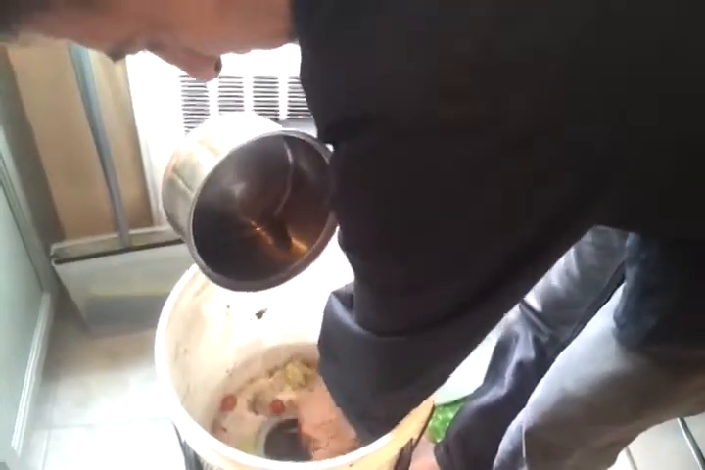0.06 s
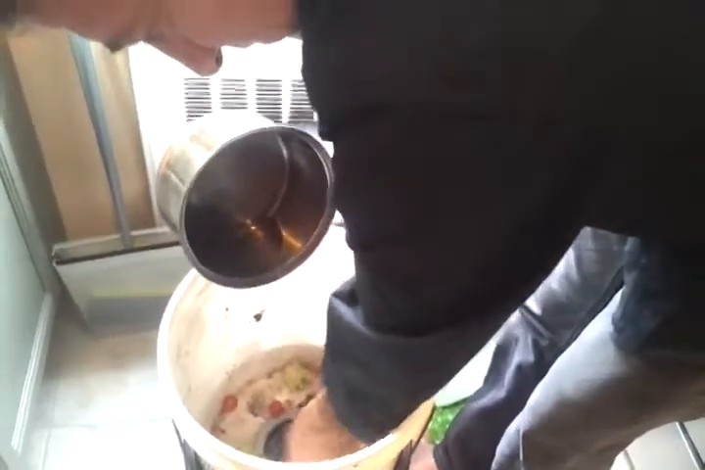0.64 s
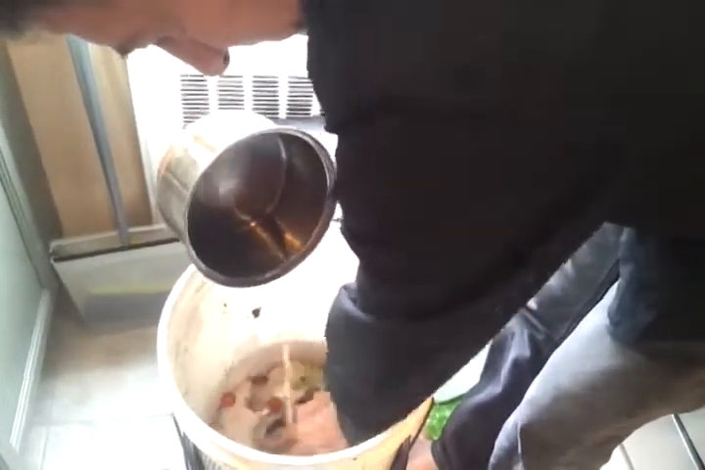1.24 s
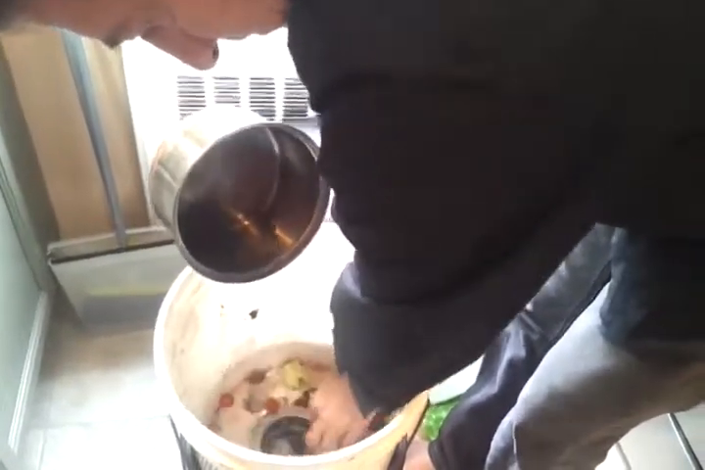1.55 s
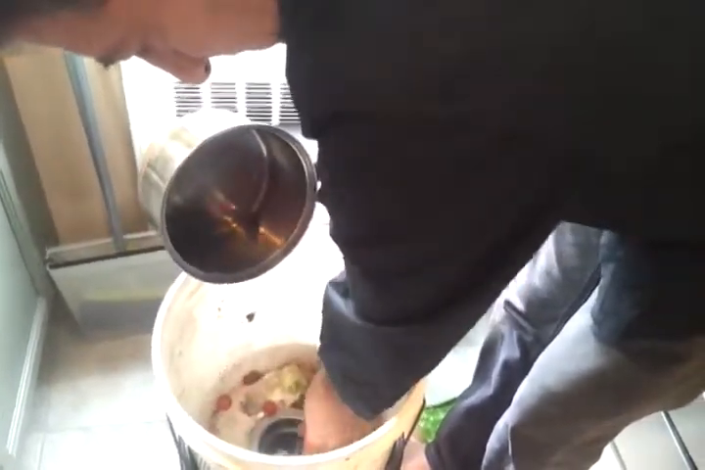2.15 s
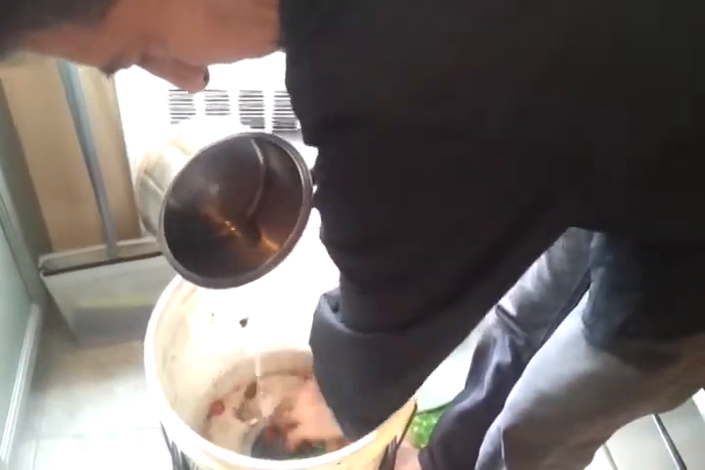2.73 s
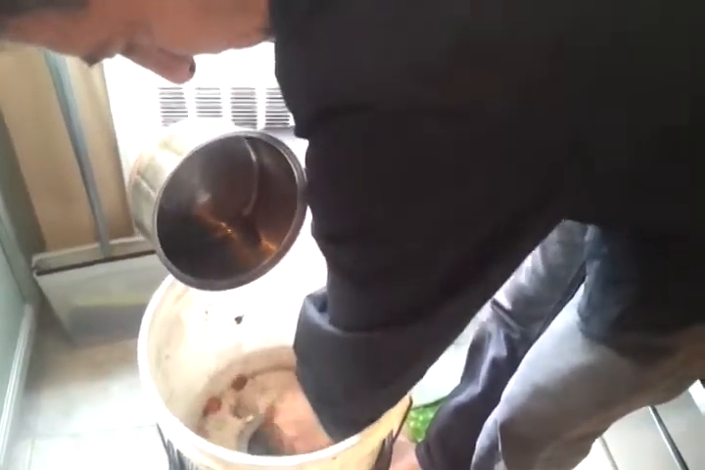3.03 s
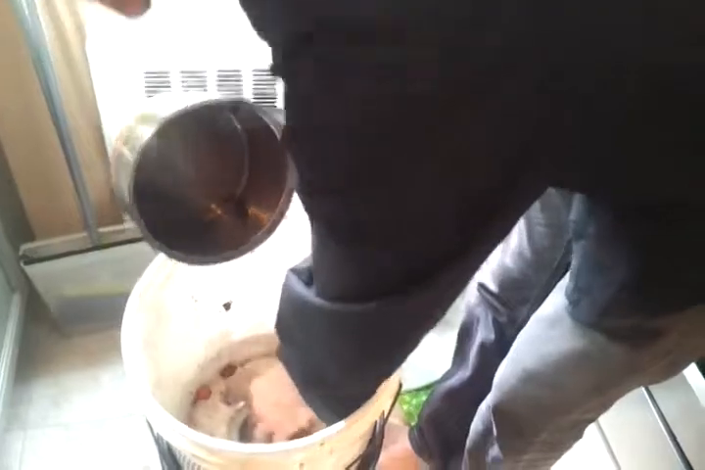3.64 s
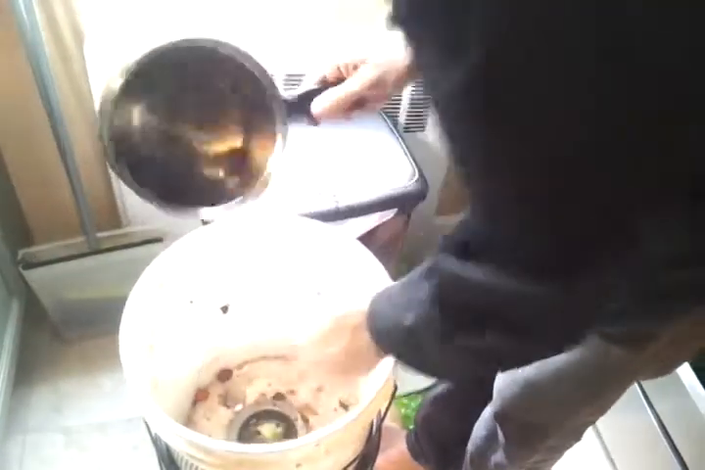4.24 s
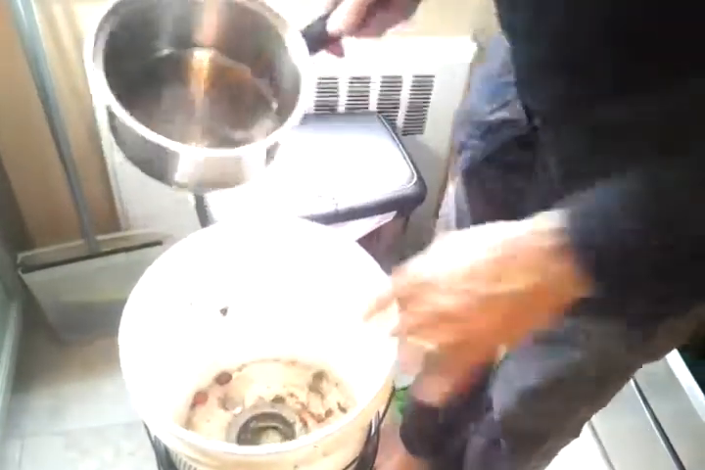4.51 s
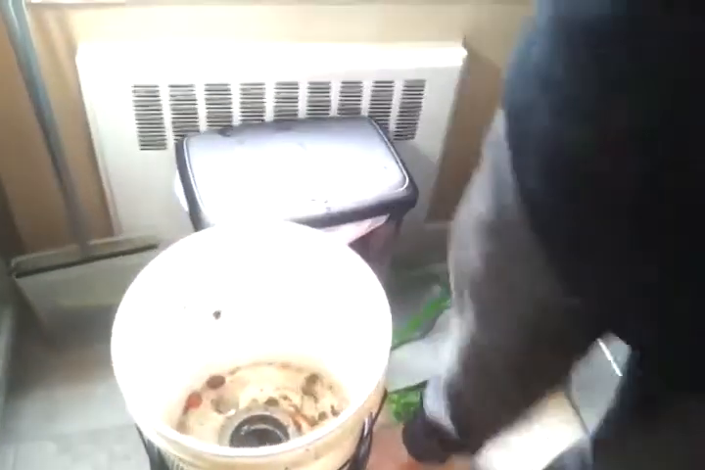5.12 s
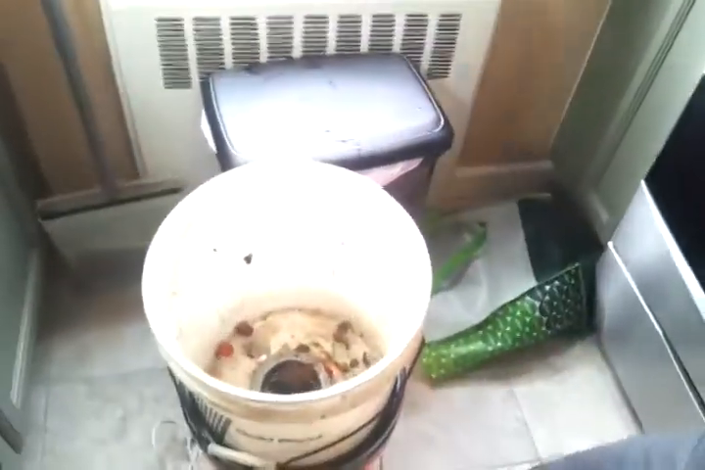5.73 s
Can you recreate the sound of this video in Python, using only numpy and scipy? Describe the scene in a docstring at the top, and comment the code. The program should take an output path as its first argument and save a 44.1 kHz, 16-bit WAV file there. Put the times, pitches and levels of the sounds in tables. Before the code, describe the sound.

Heavy, uneven thumps and rattles sound over the low hum of a grinder motor as food scraps churn beneath a plastic bucket. Hard bits clack on steel, the opening rings with a hollow howl and wet pulp squelches. In the second half the crunching turns brighter, with short gushes and spitting drops. The grinding runs throughout, heard close up in a small room.

```python
"""A heavy lump thumps and tumbles over a motor's hum: a food waste grinder under a plastic bucket,
close to one microphone in a small room. Scraps pushed in by hand rattle round the grinding chamber,
crack on its steel, ring the air in its throat and shake the bucket; wet pulp hisses and spits.
From about 3.5 s the arm is drawn out of the bucket: the air resonances rise, and a brighter crunch
and fine spray come through the opening."""
import sys
import numpy as np
from scipy import signal
from scipy.fft import rfft, irfft
from scipy.io import wavfile
from scipy.ndimage import uniform_filter1d, minimum_filter1d

SR = 44100
rng = np.random.default_rng(int(sys.argv[2]) if len(sys.argv) > 2 else 0)


def put_to_file(sound):
    """Save the sound as 16-bit audio at rate SR, in the file named by the first command-line argument."""
    columns = np.atleast_2d(sound).T  # one column per channel
    safe = np.clip(columns, -1, 1)
    whole_steps = np.round(safe * 32767)
    wavfile.write(sys.argv[1], SR, whole_steps.astype(np.int16))


N = 258867
T = np.arange(N) / SR


def amp(db):
    """Decibels to gain."""
    return 10 ** (np.asarray(db) / 20)


def unit(x):
    """Scale to rms 1."""
    return x / np.sqrt(np.mean(x ** 2) + 1e-20)


def curve(rows):
    """A table of times and values as a curve over the scene."""
    return np.interp(T, *np.transpose(rows))


def drift(rate_hz):
    """Slow random wander of rms 1."""
    f = np.fft.rfftfreq(N, 1 / SR)
    return unit(irfft(rfft(rng.standard_normal(N)) / (1 + (f / rate_hz) ** 4), N))


def colour(x, points, size=2048):
    """Causal filter with the given spectrum."""
    hz, db = np.transpose(points)
    f = abs(np.fft.fftfreq(size, 1 / SR))
    log_gain = np.log(amp(np.interp(np.log(f + 1), np.log(hz), db)))
    taps = np.fft.ifft(np.exp(np.conj(signal.hilbert(log_gain)))).real  # minimum phase
    return signal.oaconvolve(x, taps)[:N]


def resonate(x, hz, width_hz):
    """A fixed or moving resonance of gain 1."""
    turn = np.exp(2j * np.pi * np.cumsum(hz * np.ones(N)) / SR)
    pole = np.exp(-np.pi * width_hz / SR)
    return 2 * (turn * signal.lfilter([1 - pole], [1, -pole], x / turn + 1e-18)).real


def modes(x, rows):
    """A bank of fixed resonances."""
    return sum(amp(db) * signal.lfilter(*signal.iirpeak(hz, hz / width, SR), x)
               for hz, width, db in rows)


def band(x, lo_hz, hi_hz, order=2):
    """Band-pass."""
    return signal.sosfilt(signal.butter(order, [lo_hz, hi_hz], "band", fs=SR, output="sos"), x)


def rattle(per_s, spread_db, scraping, clump_db, clump_hz):
    """Force of many small impacts of uneven size over steady scraping, coming in clumps."""
    sizes = amp(spread_db * np.minimum(rng.exponential(1, N), 3)) * rng.choice([-1, 1], N)
    impacts = unit(sizes * (rng.random(N) < per_s / SR))
    return (impacts + scraping * rng.standard_normal(N)) * amp(clump_db * drift(clump_hz))


def bursts(per_s, spread_db, rise_s, decay_s, size=4096):
    """Envelope of separate bursts at random moments, rms 1; their rate may be a curve."""
    t = np.arange(size) / SR
    sizes = amp(spread_db * np.minimum(rng.exponential(1, N), 2.5))
    starts = sizes * (rng.random(N) < per_s / SR)
    shape = (1 - np.exp(-t / rise_s)) * np.exp(-t / decay_s)
    return unit(np.sqrt(abs(signal.oaconvolve(starts ** 2 / per_s, shape ** 2)[:N])))


def drone(force, hz, width_hz, skirt_hz, evenness=.5):
    """An air resonance that is kept ringing evens out toward a drone; rms 1."""
    ring = resonate(resonate(force, hz, width_hz), hz, skirt_hz)
    power = abs(uniform_filter1d(unit(ring) ** 2, size=900))
    return unit(ring / (power + .05) ** (evenness / 2))


def swells(rows, attack_s=.036, release_s=.067):
    """Gain over time of passing surges, each with an attack, a hold and a release."""
    return sum(amp(db) * np.clip(np.minimum((T - s) / attack_s, (s + length - T) / release_s), 0, 1)
               for s, length, db in rows)


def surging(base_db, rows):
    """Gain of a base level with surges added in power."""
    return np.hypot(amp(base_db), swells(rows))


# Motor lines under the bucket: f/Hz, level/dB, unsteadiness/ratio
MOTOR_LINES = [(117.4, -42, 0.14), (178.5, -35, 1.3), (298.8, -42.5, 1), (450, -47.5, 1.2)]

def motor():
    """Magnetic mains hum, nearly steady, and shaft orders that waver at random."""
    out = np.zeros(N)
    for hz, db, unsteadiness in MOTOR_LINES:
        waver = 1 + unsteadiness * (drift(8.1) + 1j * drift(5.8))
        tone = np.exp(2j * np.pi * (hz * T + rng.random()))
        out += amp(db) * unit((waver * tone).real)
    return out


# Modes of the bucket and housing: f/Hz, width/Hz, level/dB
WALL_MODES = [(135.3, 6.5, -6), (184, 6.2, -4.5), (222.6, 5.7, 2), (249.5, 5.2, 4), (270.6, 4.4, -3.5),
              (296.5, 12.3, -2), (424.2, 23, 1)]

def walls(force, boom_hz):
    """Bucket and housing ring in fixed modes; the bucket floor booms at a moving pitch."""
    return band(modes(force, WALL_MODES) + amp(-4) * resonate(force, boom_hz, 46), 122, 404, order=4)


# Heavy lumps rocking the bucket: t/s, length/s, relative level/dB
HEAVY_LUMPS = [(0, 0.41, -18.5), (1.783, 0.42, -29), (2.104, 0.17, -21), (2.827, 0.24, -22),
               (4.73, 0.19, -25), (5.296, 0.19, -21)]

def tumbling(effort_db, bare, boom_hz):
    """The tumbling load shakes the housing and the bucket on top of it; the floor rumbles faintly."""
    gain = surging(effort_db - 21.5, HEAVY_LUMPS) * amp(-1.94 - 1.5 * bare)
    shaking = unit(walls(rattle(600, 4.7, .53, .6, 23), boom_hz))
    rumble = unit(band(rng.standard_normal(N), 51, 140))
    return gain * shaking + amp(-54) * rumble


# Pitch of the air column over the rotor, lowered by the hand and by packed scraps: t/s, f/Hz
THROAT_PITCH = [(0, 1237), (.55, 1234), (.95, 1235), (1.5, 1245), (2.0, 1250), (2.3, 1203), (2.6, 1240),
                (3.099, 1272), (3.65, 1195), (4.15, 1238), (4.65, 1285), (5.2, 1260), (5.87, 1300)]
# Whirling mouthfuls of scraps that make the throat howl: t/s, length/s, relative level/dB
THROAT_HOWLS = [(0.753, 0.33, -18.5), (1.284, 0.2, -14), (1.56, 0.89, -20), (2.218, 0.2, -12.5),
                (2.756, 0.4, -22), (3.444, 0.36, -18), (4.247, 0.212, -18.5), (4.504, 0.24, -17.5),
                (4.836, 0.7, -20.5), (5.686, 0.2, -15.5)]

def throat(effort_db, clear, lower_hz=1134, upper_hz=1342):
    """Impacts keep two modes of the air column ringing; an upper one speaks when the hand is out."""
    main = drone(rattle(900, 1, .6, .4, 55), curve(THROAT_PITCH), 46, 150)
    lower = drone(rattle(600, 1, .6, .4, 50), lower_hz, 22, 110)
    upper = drone(rattle(450, 1.2, .4, .5, 50), upper_hz, 44, 62)
    ringing = main * amp(-2 * clear) + lower * amp(-9 + 3.7 * clear) + upper * amp(-.5) * clear ** 2
    return amp(-3.9) * surging(.97 * effort_db - 23, THROAT_HOWLS) * ringing


# Surges of hooting inside the bucket: t/s, length/s, level/dB relative to the usual hoot
AIR_HOOTS = [(.11, 0.34, 6), (.78, 0.11, 1), (1.5, 0.11, 8), (1.98, 0.1, 9.5), (2.26, 0.058, 6),
             (2.8, 0.32, 3), (3.43, 0.11, 8), (4.26, 0.15, 7.5), (5.36, 0.51, 5)]

def bucket_air(grind_db, clear, arm_in_hz=736, rise_hz=52, waver_hz=4):
    """The rattle sets the air in the bucket hooting, at a pitch that rises as the arm leaves."""
    hz = arm_in_hz + rise_hz * clear + waver_hz * drift(7)
    hoot = drone(rattle(500, 1.6, .7, 1.5, 22), hz, 22, 130)
    return amp(.5 * grind_db - 13.5) * surging(0, AIR_HOOTS) * hoot


# Broad spectrum of the churn: f/Hz, level/dB
CHURN_SPECTRUM = [(30, -44), (85, -26.5), (130, -21.5), (330, 10), (500, 7), (640, 3), (900, -21.5),
                  (1350, -7.5), (1480, 3), (1750, -3), (2050, -10.5), (2500, -5), (3300, -37.5),
                  (3900, -29), (9000, -63)]
# Modes of the grinding chamber: f/Hz, width/Hz, level/dB
CHAMBER_MODES = [(1030, 480, -2), (1052, 59, -17.5), (1553, 33, -9.5), (1640, 21, 1.5)]
# Modes of the air between arm and wall: f/Hz, width/Hz, level/dB
GAP_MODES = [(721, 49, -8), (812, 29, 4)]

def grinding(grind_db, clear):
    """Scraps shred on the ring in a dense churn, coloured by the chamber and the gap beside the arm."""
    force = rattle(1800, 2, .75, 2.6, 28)
    ringing = modes(force, CHAMBER_MODES) + (1 - clear) * modes(force, GAP_MODES)
    churn = colour(force, CHURN_SPECTRUM) + amp(14.5) * band(ringing, 680, 1550, order=3)
    return amp(grind_db + 6.5) * unit(churn)


# Modes of the steel rotor and grinding ring: f/Hz, width/Hz, level/dB
STEEL_MODES = [(1916, 66, -13.5), (2410, 110, -9.5), (2542, 150, 3.5), (2784, 150, -2), (3410, 46, -2),
               (4240, 37, -3), (5440, 58, -4.5), (6170, 180, -6.5), (7370, 130, -18.5)]

def clatter(grind_db):
    """Hard chips strike the steel; each mode is rung by its own stream of hits."""
    out = np.zeros(N)
    for hz, width, db in STEEL_MODES:
        chips = rattle(130, 3.2, .15, 1.5, 12)
        out += band(modes(chips, [(hz, width, db)]), hz * .8, hz * 1.2)
    return amp(grind_db - 14) * unit(out)


# Spectrum of a dry scrap breaking: f/Hz, level/dB
CRACK_SPECTRUM = [(150, -31.5), (500, 8), (900, 17.5), (1600, 7), (2800, -0.5), (3900, -16), (6500, -11.5),
                  (8500, -38.5), (14000, -50.5)]
# Crunch with a clear path from grinding ring to microphone: f/Hz, level/dB
DIRECT_SPECTRUM = [(900, -13), (1900, -21), (2600, 5), (3500, 2.5), (4100, -15), (6000, -7), (9000, -12.5),
                   (14000, -93)]

def crunch(effort_db, bare):
    """Scraps break on the ring in short clusters; a brighter crunch comes through the open bucket."""
    clusters = bursts(140, 2.2, rise_s=.002, decay_s=.007) * rattle(3500, 2, .8, 1, 30)
    bites = unit(band(colour(clusters, CRACK_SPECTRUM), 1410, 3790, order=3))
    direct = unit(colour(rattle(900, 2.4, .8, 3.8, 26), DIRECT_SPECTRUM))
    return amp(.9 * effort_db - 38.5) * bites + amp(1.5 * effort_db - 42) * bare * direct


# Spectrum of wet pulp: f/Hz, level/dB
WET_SPECTRUM = [(1500, 6.5), (3300, 11), (3900, 3.5), (4600, 7.5), (6500, 9), (7200, 8.5), (8000, -7.5),
                (10000, -71), (16000, -31.5)]
# Wet hiss, sinking when the rotor runs empty: t/s, relative level/dB
HISS_LEVEL = [(0, -52), (.13, -41), (.25, -55), (.58, -45), (.72, -70), (.95, -45.5), (1.14, -55),
              (1.27, -50), (1.4, -46), (1.85, -43), (2.1, -44.5), (2.6, -44.5), (3.1, -43.5), (3.75, -42),
              (4.3, -40), (4.48, -47), (4.63, -42), (5.1, -40.5), (5.55, -45), (5.87, -47)]

def pulp_hiss(hiss_db, gush_gain):
    """Wet pulp hisses as it is ground, and louder with each gush."""
    sloshing = rattle(1200, 3, .8, 2, 24)
    return unit(colour(sloshing, WET_SPECTRUM)) * (amp(hiss_db - 1) + amp(-4) * gush_gain)


def squelches(lo_hz, hi_hz, db_per_octave, per_s=600, cycles=18, glide=.04, pitches=48):
    """Air pockets burst in the wet pulp as short, slightly gliding tones; rms 1."""
    out = np.zeros(N)
    for hz in np.geomspace(lo_hz, hi_hz, pitches):
        t = np.arange(0, 3 * cycles / hz, 1 / SR)
        age = t * hz / cycles
        bend = 1 + rng.uniform(-glide, glide) * age / 2
        tone = np.sin(2 * np.pi * hz * t * bend) * age * np.exp(-3 * age)
        starts = rng.integers(0, N - len(t), rng.poisson(per_s * N / SR / pitches))
        sizes_db = 2.4 * np.minimum(rng.exponential(1, len(starts)), 3)
        for at, db in zip(starts, sizes_db):
            out[at:at + len(t)] += amp(db + db_per_octave * np.log2(hz / lo_hz)) * tone
    return unit(out * amp(2 * drift(16)))


def blows(times_s, levels_db, crush_s, sharp, through, size=4096):
    """Sharp blows with short bursts of crushing, sent through a filter; levels are rms over 20 ms."""
    force, t = np.zeros(N + size), np.arange(size) / SR
    for s, db in zip(times_s, levels_db):
        spectrum = rfft(rng.standard_normal(size) * np.exp(-t / crush_s))
        burst = irfft(spectrum / abs(spectrum)) * (t < .04)  # whitened, so it excites every mode
        burst[0] += sharp
        at = round(s * SR)
        force[at:at + size] += amp(db) * burst
    energy = np.sum(amp(levels_db) ** 2) * .02
    return unit(through(force[:N])) * np.sqrt(energy * SR / N)


# Soft scraps crush slowly, hard ones snap at once: crack level/dB, decay/s
CRUSH_DECAY = [(-24, .012), (-19, .007)]

def cracks(times_s, levels_db, pitches_hz, snaps_per_s=5000, q=8, size=4096):
    """A struck scrap breaks with a snap and a quick run of smaller ones, pitched by its size."""
    out, t = np.zeros(N + size), np.arange(size) / SR
    for s, db, hz in zip(times_s, levels_db, pitches_hz):
        decay = np.exp(-t / np.interp(db, *np.transpose(CRUSH_DECAY)))
        snaps = rng.standard_normal(size) * (rng.random(size) < snaps_per_s / SR) * decay
        snaps[0] += .6
        tone = signal.lfilter(*signal.iirpeak(hz, q, SR), snaps)
        crack = colour(snaps + amp(10) * tone, CRACK_SPECTRUM)[:size]
        at = round(s * SR)
        out[at:at + size] += amp(db) * unit(crack) * np.sqrt(.02 * SR / size)  # rms over 20 ms
    return out[:N]


# The hardest scraps on the rotor, levels relative:
# t/s, thump level/dB, throat ring level/dB, crack level/dB, crack f/Hz
ROTOR_KNOCKS = [(0.033, -8.5, -40, -26.5, 1500), (0.129, -21.5, -15.5, -21, 1490),
                (.158, -24, -27, -25, 760), (.231, -14.5, -24, -31, 770), (0.293, -18, -10, -18, 1070),
                (0.308, -20, -23, -24.5, 760), (0.383, -22.5, -19.5, -22.5, 1670),
                (0.444, -13.5, -15, -24, 1510), (0.48, -32.5, -20.5, -38, 1590),
                (0.509, -13, -5, -23, 2200), (0.538, -46, -20.5, -22, 2500),
                (0.574, -32.5, -17, -29.5, 1510), (.604, -20.5, -26, -22.5, 620),
                (0.707, -41.5, -37, -34, 2300), (0.804, -25.5, -17, -25.5, 800),
                (0.874, -28.5, -16.5, -35.5, 1550), (0.961, -35.5, -12.5, -27, 1700),
                (1.003, -20.5, -36.5, -43, 1600), (1.121, -39, -19.5, -35.5, 1600),
                (1.225, -41, -27, -23.5, 1630), (1.317, -33, -31.5, -24.5, 1720),
                (1.376, -32.5, -15.5, -28, 1600), (1.473, -45.5, -12, -43, 1600),
                (1.525, -42.5, -18.5, -24, 1680), (1.668, -30, -25, -25.5, 1990),
                (1.721, -28, -22, -28, 1830), (1.839, -19, -17, -28.5, 2360),
                (1.894, -28.5, -16, -29, 2250), (1.997, -11.5, -11, -22.5, 1620),
                (2.060, -41, -18, -31, 1800), (2.163, -13.5, -17, -26.5, 1600),
                (2.194, -12.5, -17, -31, 1600), (2.225, -17, -17.5, -27.5, 1610),
                (2.27, -10.5, -20.5, -41, 1600), (2.328, -29, -10.5, -28, 2600),
                (2.476, -17.5, -16.5, -28.5, 1760), (2.516, -14, -21, -33, 1860),
                (2.618, -25, -20.5, -29, 1700), (2.657, -17.5, -19.5, -32.5, 1730),
                (2.698, -23, -27, -23, 1850), (2.769, -18, -17.5, -23.5, 1720),
                (2.837, -33, -17, -32, 1600), (2.946, -28.5, -22, -36.5, 1710),
                (2.979, -30, -19.5, -25.5, 1600), (3.083, -34.5, -11.5, -28.5, 1690),
                (3.133, -28, -12.5, -28.5, 1560), (3.15, -25.5, -23.5, -22.5, 780),
                (3.412, -22.5, -28, -27, 2900), (3.457, -35.5, -17.5, -30.5, 1700),
                (3.561, -25, -12.5, -30.5, 2000), (3.595, -30, -18, -39.5, 2400),
                (3.685, -17.5, -14, -31, 1600), (3.965, -31, -15.5, -21, 2300),
                (4.279, -22.5, -23.5, -21, 1640), (4.374, -20.5, -17, -24, 1650),
                (4.485, -41.5, -14, -52, 1600), (4.537, -30, -17, -26.5, 1700),
                (4.662, -35.5, -18, -20.5, 1450), (4.731, -16.5, -27.5, -45, 1600),
                (4.76, -27.5, -19.5, -36, 2190), (4.784, -18, -32, -30.5, 2370),
                (4.831, -16.5, -20, -35, 1900), (4.882, -23, -10, -20, 3260),
                (4.99, -17.5, -14, -28.5, 1700), (5.065, -30.5, -11.5, -27.5, 1610),
                (5.192, -18, -16, -30, 1680), (5.22, -22.5, -18.5, -31, 1700),
                (5.299, -11.5, -31.5, -45, 1600), (5.324, -17, -31.5, -39, 1600),
                (5.357, -27, -24.5, -27.5, 1740), (5.560, -21, -19, -39, 1890),
                (5.728, -26, -22.5, -35, 1590), (5.797, -14, -14, -21, 1580)]

def knocks(bare, boom_hz):
    """The rotor hits a hard scrap: the bucket thumps, the throat rings, it cracks and pulp splashes."""
    def housing(force):
        return band(walls(force, boom_hz) + resonate(force, boom_hz, 60), 120, 327, order=3)

    def air_column(force):
        return band(resonate(force, curve(THROAT_PITCH), 88), 1020, 1289)

    times_s, thump_db, ring_db, crack_db, crack_hz = np.transpose(ROTOR_KNOCKS)
    splash_db = crack_db - 20.5 + 11 * np.interp(times_s, T, bare)
    thumps = blows(times_s, thump_db - 2, crush_s=.0025, sharp=.61, through=housing)
    rings = blows(times_s, ring_db - 2.8, crush_s=.0099, sharp=1.9, through=air_column)
    splashes = blows(times_s, splash_db, crush_s=.015, sharp=.1,
                     through=lambda force: colour(force, WET_SPECTRUM))
    return thumps + rings + splashes + cracks(times_s, crack_db, crack_hz)


# Short scrapes and sharp clacks of scraps on the grinding ring: t/s, length/s, level/dB, f/Hz
SCRAPES_AND_CLACKS = [(0.122, 0.11, -19, 920), (0.291, 0.0081, -5.5, 990), (1.85, 0.09, -33, 2480),
                      (2.392, 0.0098, -58, 2680), (2.754, 0.04, -27, 1980), (2.975, .03, -38, 4900),
                      (3.129, 0.022, -18, 1560), (3.548, 0.03, -33, 3360), (4.304, 0.029, -20.5, 1640),
                      (4.652, 0.023, -15, 1510), (4.77, 0.019, -26, 2190), (4.992, 0.017, -37, 6400)]

def scrapes_and_clacks():
    """Brief chatter of scraps on the steel; the shortest bursts are heard as clacks."""
    out, chatter = np.zeros(N), rattle(900, 2.5, .6, 1, 40)
    for s, length, db, hz in SCRAPES_AND_CLACKS:
        progress = np.clip((T - s) / length, 0, 1)
        arch = np.sqrt(4 * progress * (1 - progress))
        out += amp(db) * arch * unit(band(chatter, hz * .64, hz * 1.14))
    return out


# Spectrum of fine drops: f/Hz, level/dB
DROP_SPECTRUM = [(3000, -25), (5500, 0), (8000, 2), (10000, 1), (12300, -1.5), (14200, 0), (16000, -2)]
# Single drops spat against the bucket wall: t/s, relative level/dB
WALL_SPITS = [(.132, -43), (.443, -50), (.542, -42), (.602, -39), (.963, -49), (1.121, -45), (1.33, -51),
              (1.719, -44), (1.85, -46), (1.997, -43), (2.165, -48), (2.235, -48), (2.345, -48),
              (2.477, -43), (2.72, -50), (3.251, -42), (3.489, -43), (3.764, -43), (3.883, -42),
              (3.966, -34), (4.66, -31), (4.881, -29), (5.24, -44), (5.434, -38), (5.653, -44), (5.73, -37),
              (5.81, -39)]

def spits(rise_s=.005, decay_s=.011, size=3000):
    """Drops burst on the wall in a brief fizz that swells to its peak and dies."""
    force, t = np.zeros(N + size), np.arange(size) / SR - 4 * rise_s
    envelope = np.exp(np.minimum(t / rise_s, -t / decay_s))
    for s, db in WALL_SPITS:
        at = round((s + t[0]) * SR)
        force[at:at + size] += amp(db - 2) * rng.standard_normal(size) * envelope
    return colour(force[:N], DROP_SPECTRUM)


# Fine spray leaving the bucket: t/s, level/dB
SPRAY_LEVEL = [(0, -72), (1.3, -76), (1.65, -64), (2.5, -63), (2.85, -70), (3.3, -61), (3.8, -57),
               (4.0, -45), (4.38, -46), (4.48, -55), (4.6, -46), (4.85, -48), (5.0, -50), (5.6, -52),
               (5.8, -46)]
# Gushes of wet pulp out of the opening: t/s, length/s, level/dB
PULP_GUSHES = [(1.625, 0.16, -47), (3.45, 0.067, -28.5), (3.95, 0.13, -62), (4.59, 0.12, -36.5),
               (4.75, 0.068, -33), (5.399, 0.065, -41), (5.703, 0.12, -45)]

def spray(bare):
    """Fine high spray hiss that flutters in short bursts, denser when the pulp lies bare."""
    flutter = bursts(per_s=14 + 80 * bare, spread_db=4, rise_s=.02, decay_s=.011)
    hiss = unit(colour(rattle(1500, 3, .9, 1, 24), DROP_SPECTRUM))
    return hiss * flutter * surging(curve(SPRAY_LEVEL), PULP_GUSHES)


def room(x, t60_s=.12, tail_db=-11, echoes_per_s=2500, size=16384):
    """Close walls return a short dense tail, reaching the microphone 4 ms after the direct sound."""
    t = np.arange(size) / SR
    echoes = rng.choice([-1, 1], size) * (rng.random(size) < echoes_per_s / SR)
    taps = echoes * (t > .004) * amp(-60 * t / t60_s)
    tail = signal.oaconvolve(band(x, 970, 12000, order=1), taps / np.linalg.norm(taps))[:N]
    return x + amp(tail_db) * tail


# How hard the rotor works; it nearly runs empty twice: t/s, level/dB
ROTOR_EFFORT = [(0, 3), (.17, -2.5), (.36, -2), (.62, 0), (.73, -6.5), (.84, -2), (.99, -2.5), (1.1, -5.5),
                (1.2, -6), (1.28, -6), (1.35, -0.5), (1.85, -1), (2.55, -2), (3.4, 2.5), (3.82, 0),
                (4.12, 1), (4.5, -1), (4.63, 0.5), (5.5, -1.5), (5.87, 0.5)]
# The arm drawn out of the bucket: t/s, share of the opening clear/0-1
ARM_CLEAR = [(3.55, 0.03), (3.9, 0.6), (4.3, 0.99), (5.87, 0.85)]
# Pulp draining off the rotor: t/s, share left/0-1
PULP_SHARE = [(4.95, 0.9), (5.4, 0.5), (5.87, 0.6)]

def scene():
    """The motor, and the hollow, hard and wet sounds of the load, heard from one spot in the room."""
    effort_db, hiss_db, clear = curve(ROTOR_EFFORT), curve(HISS_LEVEL), curve(ARM_CLEAR)
    grind_db = effort_db - 30.5
    bare = clear * curve(PULP_SHARE)  # pulp lying open to the room
    boom_hz = 256 + 11.4 * drift(rate_hz=.57)  # the bucket floor's pitch wanders as the load shifts
    hollow = tumbling(effort_db, bare, boom_hz) + throat(effort_db, clear) + bucket_air(grind_db, clear)
    hard = grinding(grind_db, clear) + clatter(grind_db) + crunch(effort_db, bare)
    hard += knocks(bare, boom_hz) + scrapes_and_clacks()
    wet = pulp_hiss(hiss_db, swells(PULP_GUSHES)) + spits() + spray(bare)
    wet += amp(grind_db - 8.5) * squelches(1550, 3400, db_per_octave=-9)  # large pockets in the churn
    wet += amp(hiss_db - 7) * squelches(4600, 7000, db_per_octave=0)  # small ones in the hiss
    return (motor() + room(hollow + hard + wet))[None]


def record(dry, ceiling=.67, edge_hz=15900):
    """One microphone channel: a quick limiter holds the peaks down, then a low-pass trims the top."""
    needed = np.minimum(1, ceiling / (abs(dry[0]) + 1e-9))
    gain = uniform_filter1d(minimum_filter1d(needed, size=300), size=300)
    low_pass = signal.firwin(511, edge_hz, window=("kaiser", 9), fs=SR)
    return signal.oaconvolve(dry * gain, low_pass[None], "same")


dry = scene()
out = record(dry)
put_to_file(out)
```